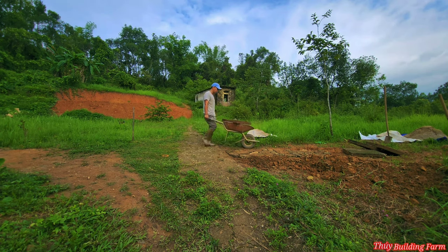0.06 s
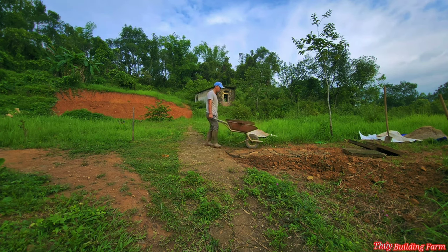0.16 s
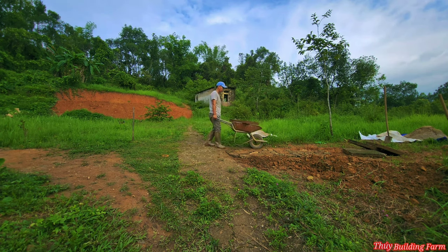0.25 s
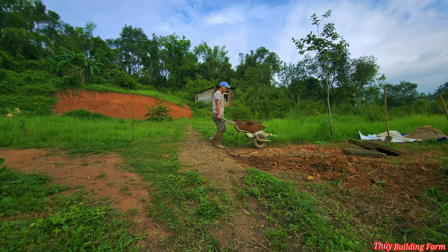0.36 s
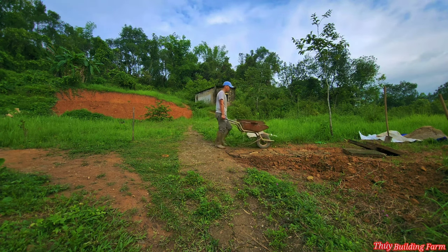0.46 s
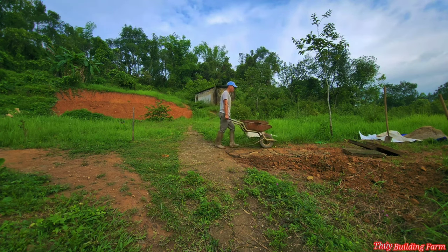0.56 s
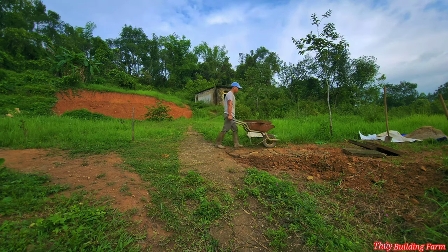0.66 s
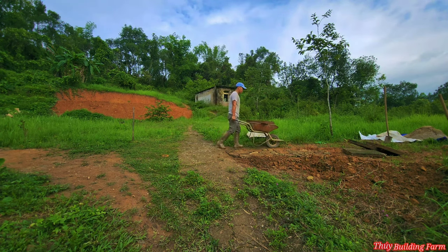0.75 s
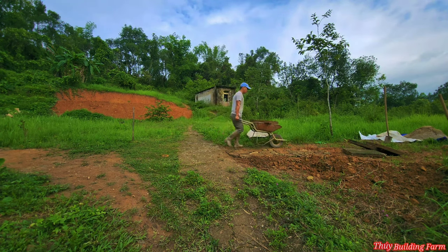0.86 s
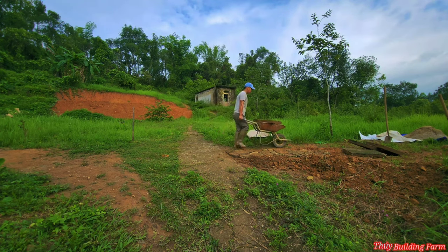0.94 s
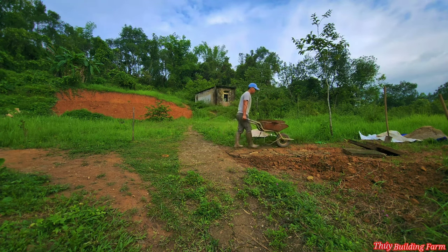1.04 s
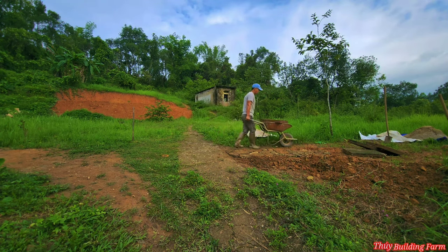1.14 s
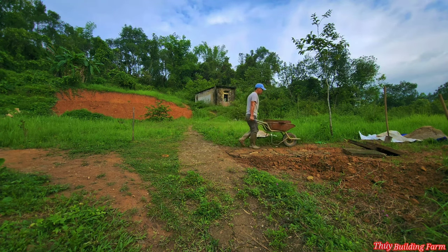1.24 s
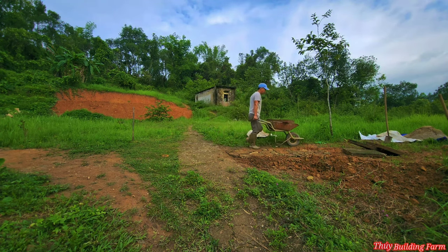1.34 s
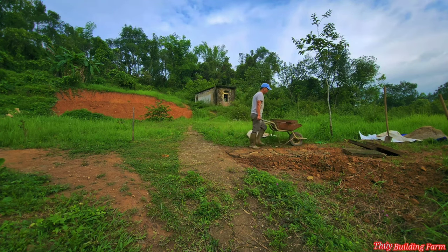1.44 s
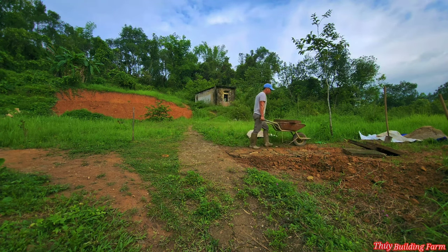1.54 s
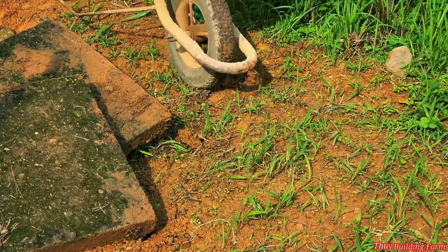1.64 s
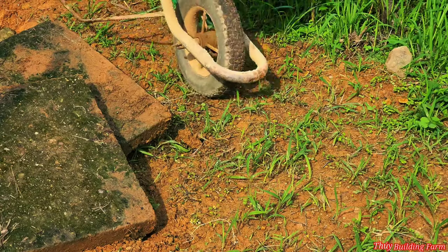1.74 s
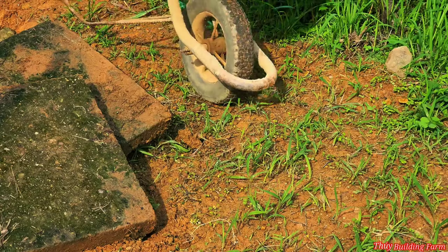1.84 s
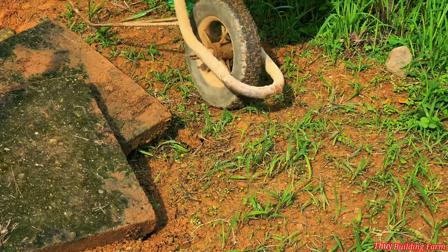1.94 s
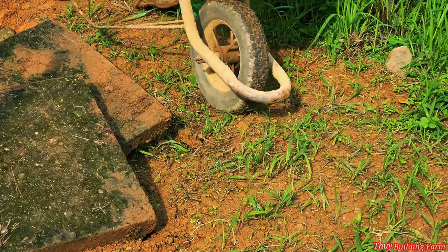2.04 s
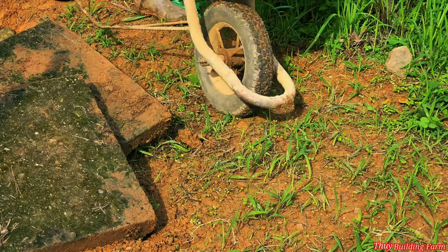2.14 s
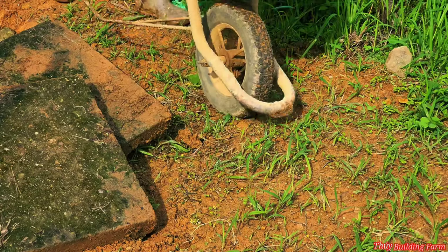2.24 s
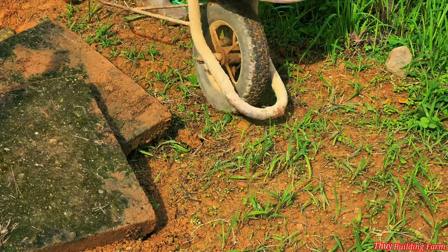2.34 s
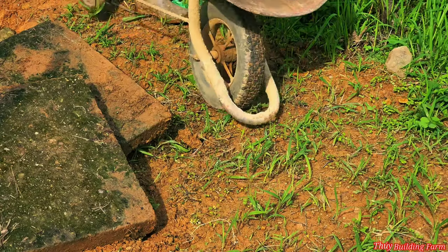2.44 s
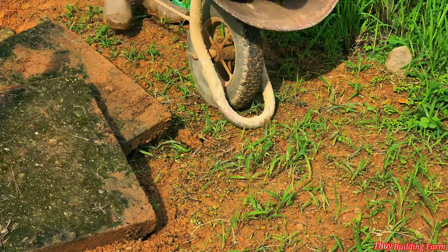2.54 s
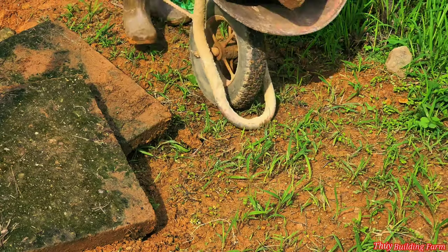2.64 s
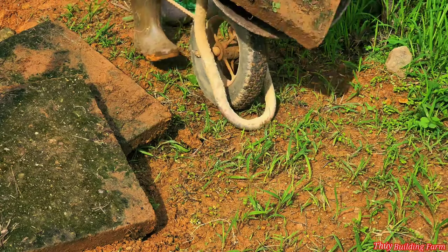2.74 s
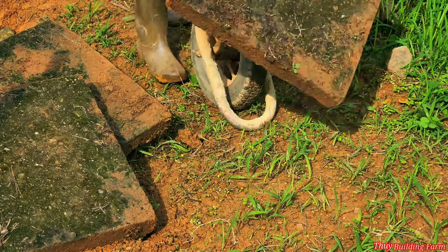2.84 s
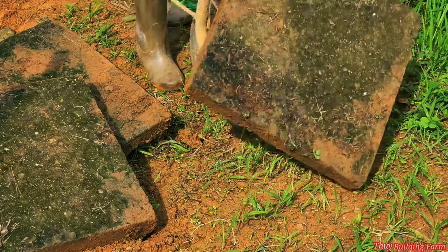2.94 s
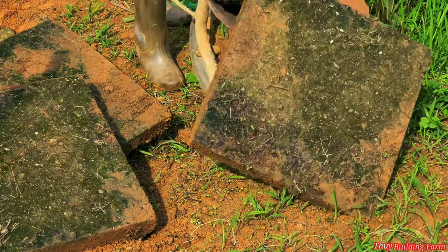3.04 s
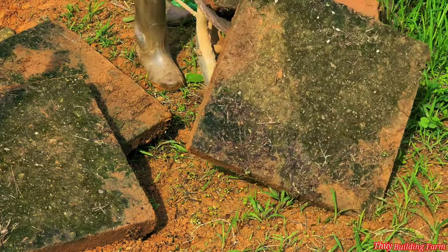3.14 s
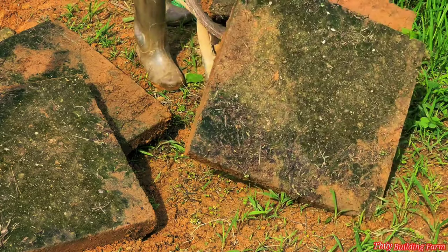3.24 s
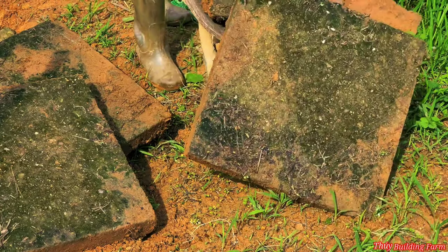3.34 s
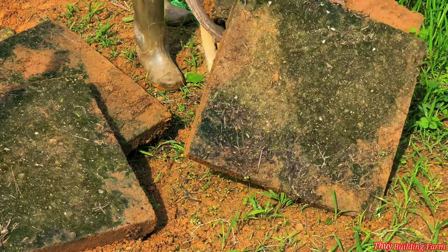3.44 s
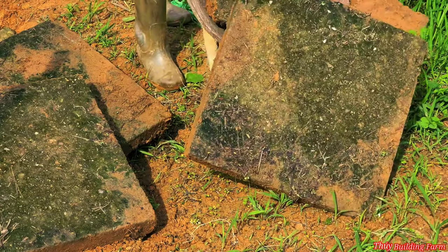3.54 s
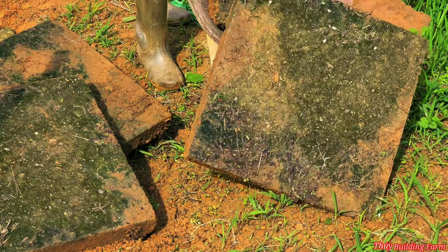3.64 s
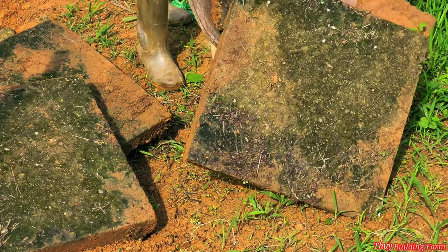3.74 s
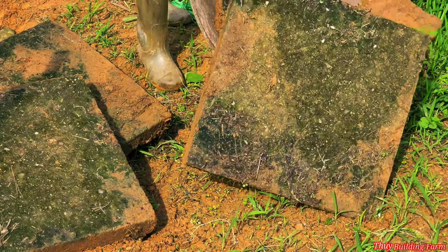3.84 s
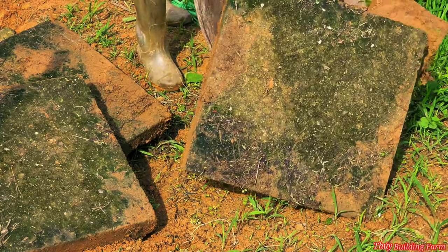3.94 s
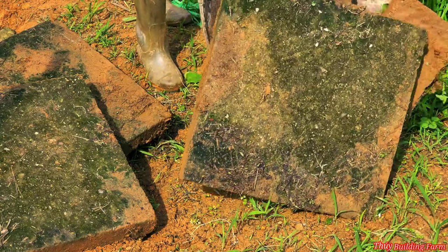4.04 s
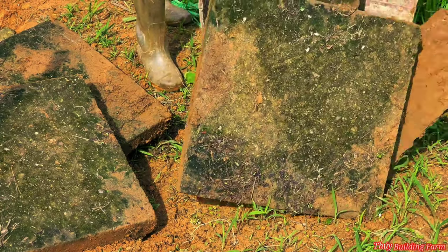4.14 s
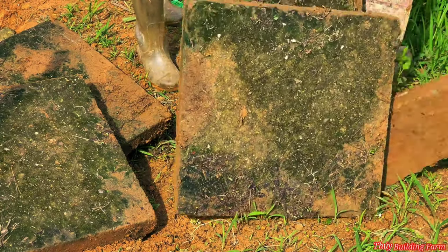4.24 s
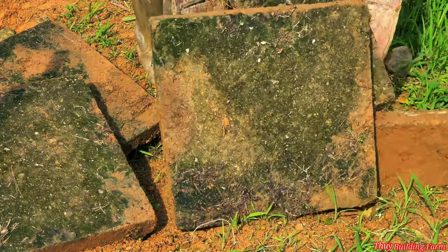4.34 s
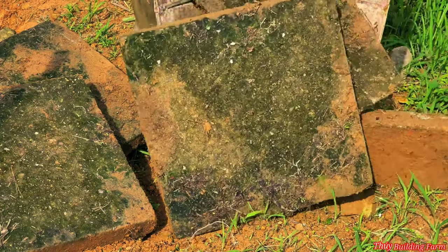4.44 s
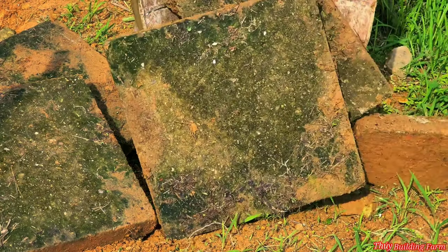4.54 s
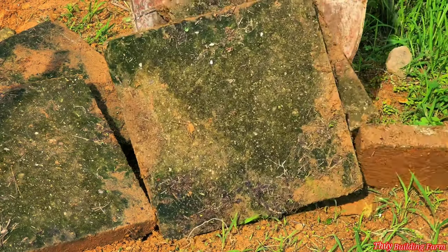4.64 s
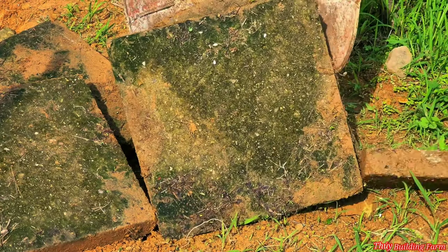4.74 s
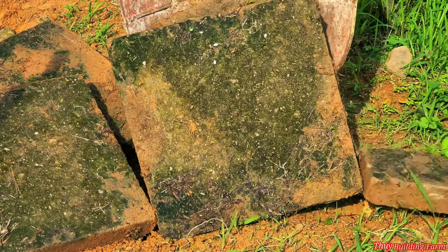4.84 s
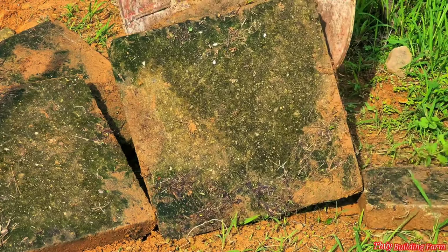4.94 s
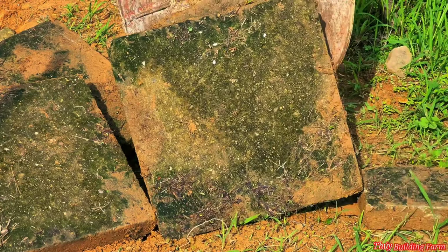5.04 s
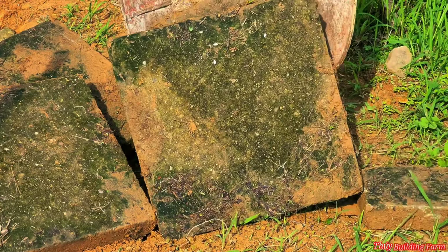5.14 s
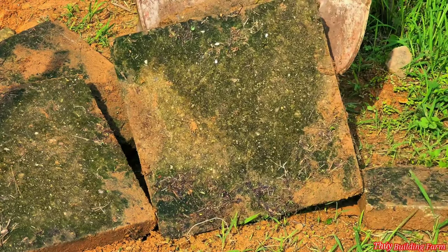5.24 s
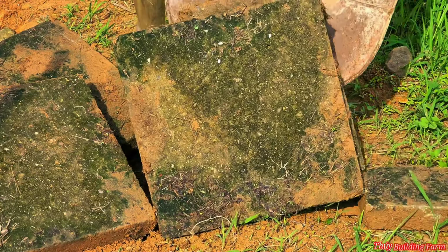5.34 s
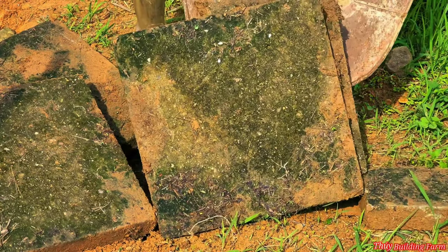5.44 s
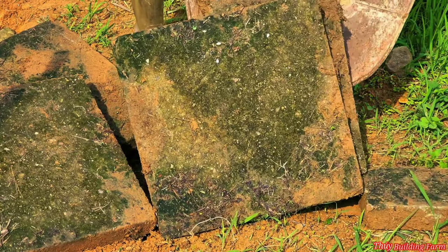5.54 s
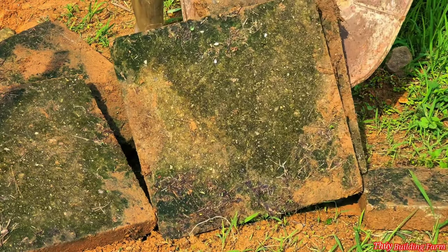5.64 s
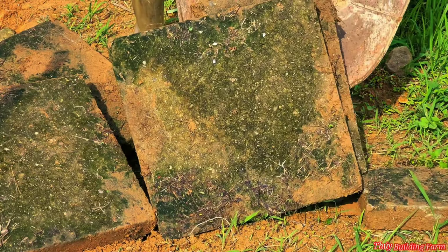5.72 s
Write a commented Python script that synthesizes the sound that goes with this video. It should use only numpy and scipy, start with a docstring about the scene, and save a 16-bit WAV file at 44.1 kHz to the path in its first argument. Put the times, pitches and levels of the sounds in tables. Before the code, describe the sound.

A quiet open field: cicadas shimmer and pulse all around, a thin high cricket trills slightly left, and faint air and leaves hiss. From 0 to 1.8 s a distant wheelbarrow gives small thumps, dry crunches, light rattles and faint creaks; a small bird to the right throws quick falling chirps at about 0.7-1.1 s. The insects become steadier after 1.7 s, with very faint chirps near 2.3 s. At about 2.65 s, close and much louder, stone slabs grind in jerky lurches down a steel tray until 3.4 s, gritty and rasping, with a tiny high squeak. A lull follows, with slight scraping, soft squeals and bird whistles at 3.6-4.0 s. From 4.05 to 4.95 s heavier sliding returns with hollow tray booms, sharp skids and a clack at 4.5 s. Knocks settle from 5.0 s, a bright scrape and squeal comes at 5.27 s, then small scrapes and a last light knock at 5.65 s.

```python
"""On a breezy field, a steel wheelbarrow is pushed far off among cicadas, a cricket and a small bird.
Then, close by, it is tipped: stone slabs judder down the booming tray, skid grittily over one another
and knock as they settle on the dirt. Random jolts and grains shake the resonances of stone and steel;
filtered noise makes cicadas, air and leaves; sliding sines make the bird, creaks and squeals."""
import sys
import numpy as np
from scipy import signal
from scipy.fft import rfft, irfft
from scipy.io import wavfile
from scipy.ndimage import uniform_filter1d

SR = 44100
rng = np.random.default_rng(int(sys.argv[2]) if len(sys.argv) > 2 else 0)


def inscribe(sig):
    """Save sig as 16-bit PCM at rate SR to the path in sys.argv[1].

    A 1-D sig is mono; a 2-D sig holds one channel per row.
    Samples are clipped to [-1, 1] before scaling.
    """
    pcm = np.round(np.clip(np.atleast_2d(sig).T, -1, 1) * 32767)
    wavfile.write(sys.argv[1], SR, pcm.astype(np.int16))


N = 254898

# resonances of the steel tray under grinding: pitch_hz, width_hz, relative level_db
TRAY_MODES = [(153.4, 36, -2), (202.3, 15.7, 0.5), (233.9, 9.5, 3.5), (319.3, 24, -5.5), (370, 18, -5.5),
              (388.3, 7.1, 1), (421.8, 15, -5), (517.5, 31, 0.5), (540.5, 6.9, -7.5), (605.3, 17, -1),
              (856, 79, -2), (882.5, 4.1, 7.5), (932.7, 8.8, 3.5), (1120, 5.4, -13), (1341, 6.3, 3),
              (1462, 47, -10), (1560, 7, -3), (1870, 13, -9), (1884, 71, -10), (2090, 27, -11),
              (2250, 29, -17)]
# tray and frame flexing as a whole: pitch_hz, width_hz, relative level_db
FRAME_MODES = [(54, 9.1, -9), (81, 10, -0.5), (92.4, 17, 1), (120, 15, 5)]
# a slab's own ring: pitch_hz, width_hz, relative level_db
SLAB_MODES = [(455, 73, -4), (503, 8.5, -7), (868, 20, 1), (1015, 5.5, 10), (1314, 18, 8.5),
              (1650, 7.7, -25), (2225, 74, -2), (2420, 60, -13), (2720, 14, -7), (3350, 24, -8),
              (3560, 13, -8), (4400, 14, -7), (4920, 23, -6.5)]
# tone colour of rubbed slabs: frequency_hz, relative level_db (per Hz)
SLAB_SPECTRUM = [(90, -8.5), (180, -10.5), (450, 8), (760, 9), (950, 9), (1400, 1), (1750, -2.5),
                 (2100, -34), (2800, -31.5), (5000, -17.5), (15000, -38)]


def from_db(db):
    """Turn decibels into a gain."""
    return np.exp(np.asarray(db) * (np.log(10) / 20))


def rms_one(x):
    """Scale a sound to an average power of one."""
    return x / np.sqrt(np.mean(x ** 2) + 1e-20)


def seconds():
    """The time of every sample."""
    return np.arange(N) / SR


def gains(rows):
    """Turn each dB column of a curve over time into a gain for every sample."""
    s, *columns = np.transpose(rows)
    return [from_db(np.interp(seconds(), s, column)) for column in columns]


def colour(x, spectrum):
    """Filter with the given spectrum, responding as promptly as possible (minimum phase)."""
    size = 8192
    hz, db = np.transpose(spectrum)
    grid_hz = np.maximum(np.arange(size // 2 + 1) * SR / size, 1)
    grid_db = np.interp(np.log(grid_hz), np.log(hz), db)
    # folding the cepstrum forward makes the filter answer only after its input
    cepstrum = irfft(np.log(from_db(grid_db)))
    cepstrum[1:size // 2] *= 2
    cepstrum[size // 2 + 1:] = 0
    response = irfft(np.exp(rfft(cepstrum)))
    response = response.reshape((1,) * (x.ndim - 1) + (-1,))
    return signal.fftconvolve(x, response, axes=-1)[..., :N]


def band(x, low_hz, high_hz):
    """Gently keep the frequencies between two limits."""
    limits_hz = [low_hz, min(high_hz, SR / 2 - 500)]
    return signal.sosfilt(signal.butter(2, limits_hz, "band", fs=SR, output="sos"), x)


def noise(channels=1):
    """White noise, unrelated in each channel."""
    return rng.standard_normal((channels, N))


def drift(per_s):
    """A random wander around zero, with per_s new random values a second joined by lines."""
    knots = rng.standard_normal(N // 8)
    return np.interp(seconds() * per_s, np.arange(len(knots)), knots)


def slips(per_s, spread_db, channels=1):
    """Random catches and releases of rough stone, as clicks of uneven size and either sign."""
    sizes = from_db(spread_db * np.minimum(rng.exponential(1, (channels, N)), 4))
    chance = rng.uniform(-1, 1, (channels, N))
    happens = np.abs(chance) < per_s / SR
    return rms_one(sizes * np.sign(chance) * happens)


def resonate(x, modes, wander_db=0):
    """Ring side-by-side resonances; as the contact point moves, each is driven now more, now less."""
    out = 0
    for k, (hz, width_hz, db) in enumerate(modes):
        r = np.exp(-np.pi * width_hz / SR)   # a wider resonance dies sooner
        poles = [1, -2 * r * np.cos(2 * np.pi * hz / SR), r * r]
        drive = x * from_db(wander_db * drift(24)) if wander_db else x
        ring = signal.lfilter([1, 0, -1], poles, drive + 1e-18)
        out = out + (-1) ** k * from_db(db) * (1 - r * r) / 2 * ring
    return out


def steady(x, size=3000):
    """Even out the slow level over size samples and keep the fast grain."""
    return x / np.sqrt(np.abs(uniform_filter1d(x ** 2, size)) + 1e-9)


def stroke(start_s, rise_s, fall_s):
    """The level of a rub, which bites quickly, peaks and runs out."""
    t = seconds() - start_s
    return np.sqrt(np.clip(t / rise_s, 0, 1)) * np.clip(1 - (t - rise_s) / fall_s, 0, 1)


def scatter(x, t60_s, channels=1):
    """Echo off many surfaces: a dense cloud of reflections that falls 60 dB in t60_s."""
    t = np.arange(SR // 2) / SR
    cloud = rng.standard_normal((channels, len(t))) * from_db(-60 * t / t60_s)
    cloud /= np.sqrt(np.sum(cloud ** 2, axis=1, keepdims=True))
    return signal.fftconvolve(np.atleast_2d(x), cloud, axes=1)[:, :N]


def glide(start_s, length_s, first_hz, last_hz, bend):
    """A sine that swells and fades while its pitch slides; bend shapes the slide."""
    out = np.zeros(N)
    at = round(start_s * SR)
    u = np.linspace(0, 1, round(length_s * SR))
    hz = first_hz + (last_hz - first_hz) * u ** bend
    swell = np.sqrt(2) * np.sin(np.pi * u)
    out[at:at + len(u)] = swell * np.sin(2 * np.pi * np.cumsum(hz) / SR)
    return out


def widen(mid, side):
    """Make left and right from a centre and a difference: bass is central, treble comes from all round."""
    # filter on the left-right difference: frequency_hz, level_db
    width_curve = [(60, -13), (110, -68), (200, -27), (380, -19.5), (700, -12.5), (1290, -12), (2380, -7),
                   (4400, -1.5), (8120, 1), (15000, 0.5)]
    return mid + colour(side, width_curve) * [[1], [-1]]


def between_faces(x, share, gap_s, count=4):
    """Reflections between moving slab faces: their paths change, so the colour keeps shifting."""
    out = x
    for k in range(count):
        lag = gap_s * SR * np.sqrt(np.e) ** k * (1 + .1 * np.clip(drift(11), -3, 3))   # in samples
        delayed = x[:, np.clip(np.arange(N) - lag.astype(int), 0, N - 1)]
        out = out + share * (-1) ** k * delayed
    return out


def air():
    """Filtered noise for open air, a breeze rumbling close to the ground and a thin hiss of leaves."""
    # tone colour of the open field: frequency_hz, relative level_db
    field_spectrum = [(25, -18), (60, -6), (110, 0), (160, -1), (240, -12), (400, -16), (680, -19),
                      (1000, -24), (1700, -24), (2700, -34), (3500, -40)]
    # low rumble of the breeze: time_s, level_db
    breeze_curve = [(0, -85), (1.7, -78), (2.0, -59.5), (5.78, -45)]
    # tone colour of the leaves: frequency_hz, relative level_db (per Hz)
    leaf_spectrum = [(400, -8), (1500, 6), (3000, -4), (6000, -4), (10000, -5.5), (15000, -7.5)]
    partly_shared = noise() + 0.41 * noise(channels=2)   # left and right are alike but not equal
    field = from_db(-59.5) * rms_one(colour(band(partly_shared, 28, 5500), field_spectrum))
    breeze = gains(breeze_curve)[0] * rms_one(band(noise(), 51, 115))
    leaves = from_db(-61.5) * rms_one(colour(noise(channels=2), leaf_spectrum))
    return field + breeze + leaves


def throbbing():
    """Gain of the cicada chorus, which throbs quickly in step and surges every few throbs."""
    throb_s, throbs_per_surge, surge_at_s = .1295, 4, .39
    turn = 2 * np.pi * (seconds() - surge_at_s) / throb_s
    swing_db = 1.4 * np.cos(turn) + 1.3 * np.cos(turn / throbs_per_surge)
    depth = np.where(seconds() < 1.7, 1, 0.071)   # from 1.7 s the chorus is more even
    return from_db(-49.5 + swing_db * depth)


def insects():
    """A cicada chorus of flickering noise shimmers all round; a pulsed high tone is one cricket's trill."""
    # tone colour of the cicadas: frequency_hz, relative level_db
    cicada_spectrum = [(3500, -33), (4200, -11), (5000, -4), (5450, 4), (5850, -0.5), (6200, -12),
                       (6800, -26), (7800, -10.5), (8500, -16), (8900, -20.5)]
    # the cricket before it is placed left of centre: time_s, level_db
    cricket_curve = [(0, -65), (1.78, -63.5), (1.88, -70), (5.78, -62)]
    chorus = rms_one(colour(band(noise(channels=2), 3500, 9500), cicada_spectrum))
    chorus = chorus * from_db(1.1 * drift(180) + 1.1 * drift(20))
    wingbeat = (.5 + .5 * np.cos(2 * np.pi * 40 * seconds())) ** 0.99   # 40 pulses a second
    tone_hz = 8530 + 35 * drift(200)
    tone = np.sin(2 * np.pi * np.cumsum(tone_hz) / SR)
    trill = gains(cricket_curve)[0] * rms_one(wingbeat * tone) * from_db([[-1.0], [-5.0]])
    return throbbing() * chorus + trill


def far_barrow():
    """Wheel and boots thump on the path, dry dirt crunches, the load rattles, the wheel creaks."""
    # bumps along the path: start_s, length_s, thump_db, crunch_db, rattle_db
    bump_table = [(0.029, 0.054, -49, -46.5, -51.5), (0.056, 0.19, -54, -45.5, -67),
                  (.385, 0.056, -51.5, -49.5, -47.5), (0.422, 0.043, -48.5, -49, -47.5),
                  (0.807, 0.046, -63, -79, -76), (1.299, .16, -55.5, -52.5, -63),
                  (1.446, .17, -60, -53.5, -61), (1.828, 0.021, -51.5, -58, -71)]
    # faint creaks of the wheel: start_s, length_s, first_hz, last_hz, level_db (before it flickers)
    creak_table = [(0.542, 0.14, 390, 346, -68), (1.292, 0.069, 395, 296, -56),
                   (1.49, 0.12, 282, 407, -60.5)]
    # tone colours of thump, crunch and rattle: frequency_hz, relative level_db
    thump_spectrum = [(60, 4), (160, 21), (370, 10), (600, 22), (1200, 2), (4000, -50)]
    crunch_spectrum = [(300, -25), (600, -8), (950, -14), (1400, -3), (1850, 1), (2200, -9), (2600, -14),
                       (5000, -28), (12000, -45)]
    rattle_spectrum = [(1000, -21), (3000, 22), (8000, 14), (15000, 0)]
    rise_share = 0.28   # of a bump's length
    # one set of grains common to both ears, one different in each
    grains = slips(per_s=2500, spread_db=4) + slips(per_s=2500, spread_db=4, channels=2)
    bumps = [(stroke(s, length_s * rise_share, length_s * (1 - rise_share)), levels_db)
             for s, length_s, *levels_db in bump_table]
    creaks = sum(from_db(db) * glide(s, length_s, first_hz, last_hz, bend=0.91)
                 for s, length_s, first_hz, last_hz, db in creak_table)
    out = creaks * from_db(6.3 * drift(52.0))
    for k, spectrum in enumerate([thump_spectrum, crunch_spectrum, rattle_spectrum]):
        level = sum(bump * from_db(levels_db[k]) for bump, levels_db in bumps)
        out = out + rms_one(colour(grains, spectrum)) * level
    return out


def bird():
    """Runs of quick falling chirps and a few whistles from the right, with a faint echo from the trees."""
    # runs of chirps: first_chirp_middle_s, chirp_count, first_chirp_db (before placing)
    phrases = [(.727, 4, -42), (.949, 3, -41), (2.27, 2, -58), (2.424, 3, -60)]
    # longer falling whistles: start_s, length_s, level_db (before placing)
    whistles = [(3.637, 0.026, -47.5), (3.695, 0.053, -43), (3.968, .06, -44)]
    gap_s, chirp_s, swell_db = .036, .0222, 1.2   # each chirp is a little louder than the last
    song = 0
    for s, count, db in phrases:
        for k in range(round(count)):
            start_s = s + k * gap_s - chirp_s / 2
            song = song + from_db(db + swell_db * k) * glide(start_s, chirp_s, 5080, 4000, bend=1.15)
    for s, length_s, db in whistles:
        song = song + from_db(db) * glide(s, length_s, 5800, 3780, bend=0.5)
    echo = from_db(-12) * scatter(song, t60_s=0.28, channels=2)
    return song * from_db([[-3.0], [3.0]]) + echo


def lurch(start_s, rise_s, hold_s):
    """Sliding speed: the slab gathers way, keeps it and is braked by friction."""
    t = seconds() - start_s
    stop_db_per_s = 165
    braking = from_db(-stop_db_per_s * np.maximum(t - rise_s - hold_s, 0))
    return np.clip(t / rise_s, 0, 1) * braking


def slide_levels():
    """Each lurch drives low grinding, treble bite and the tray's boom; lurches add in power."""
    # a slab lurches, slides and stops: start_s, rise_s, hold_s, relative level_db,
    # treble bite_db and tray boom_db (both against the level)
    lurches = [(2.652, 0.057, 0.11, -22.5, -8.5, -16.5), (2.746, 0.049, 0.046, -12.5, -6, -19),
               (2.844, 0.067, 0.12, -10, -6, -21.5), (3.036, 0.051, 0.17, -10.5, -5.5, -12.5),
               (3.274, 0.029, 0.064, -10, -5.5, -11), (3.485, 0.032, 0.17, -36.5, -6.5, 1.5),
               (3.67, 0.079, 0.36, -27.5, -5, -6.5), (4.076, 0.045, 0.07, -13.5, -9, -5.5),
               (4.172, .07, 0.07, -11.5, -4.5, -11), (4.385, 0.058, .05, -19, -1, -5),
               (4.517, 0.014, 0.051, -15.5, -1, -1.5), (4.596, .03, 0.065, -18, -3, -7.5),
               (4.704, 0.063, 0.095, -11.5, -5, -9), (4.88, 0.021, 0.025, -11.5, -11.5, -4),
               (5.305, 0.063, 0.11, -24, -3.5, -3), (5.462, 0.016, 0.014, -22, -16, -21),
               (5.56, 0.03, 0.2, -41, -6, -5.5)]
    power = 0
    for s, rise_s, hold_s, db, bite_db, boom_db in lurches:
        levels = from_db([[db], [db + bite_db], [db + boom_db]])
        power = power + (lurch(s, rise_s, hold_s) * levels) ** 2
    return np.sqrt(power)


def sliding():
    """Stick-slip jolts shake slab, tray and frame; sand is crushed under each jolt."""
    # tone colour of crushed sand: frequency_hz, relative level_db (per Hz)
    grit_spectrum = [(800, -11), (2300, 12.5), (3500, 6.5), (5000, 2.5), (8000, -2.5), (11000, -6),
                     (13500, -3.5), (15500, -5.5)]
    low, high, boom = slide_levels()
    grit = from_db(-10) * high ** 0.92   # sand grows a little more slowly than the bite
    jolts = slips(per_s=300, spread_db=3.5)[0]
    force = jolts + from_db(-7) * slips(per_s=5000, spread_db=3)[0]
    reflected = between_faces(force[None], share=0.73, gap_s=.004)[0]
    stone = steady(colour(reflected, SLAB_SPECTRUM))
    tray = steady(resonate(force, TRAY_MODES, wander_db=5.5))
    shaken = stone + tray
    grind = low * steady(band(shaken, 179, 607))
    bite = from_db(2.5) * high * steady(band(shaken, 1020, 2970))
    frame = steady(band(resonate(force, FRAME_MODES), 30, 220), size=2200)
    body = grind + bite + from_db(-1.5) * boom * frame
    # each jolt presses on the sand for about 23 ms
    pressure = rms_one(signal.lfilter([1], [1, -np.exp(-1 / (0.023 * SR))], np.abs(jolts)))
    grains = slips(per_s=4200, spread_db=0.5, channels=2) * (.5 + pressure)
    sand = grit * steady(colour(between_faces(grains, share=0.65, gap_s=.0011), grit_spectrum))
    return widen(body + sand[0], scatter(body, t60_s=0.14)[0] + sand[1])


def knocking():
    """An edge lands and crumbles for a few ms; the slab rings briefly and the tray answers."""
    # slabs knock: time_s, then relative thud_db, clack_db, crack_db
    knocks = [(2.681, -20.5, -24.5, -56), (4.514, -13, -17, -22), (4.975, -17, -40, -24.5),
              (5.04, -20.5, -29, -30.5), (5.122, -18, -19.5, -24.5), (5.22, -13.5, -17.5, -21),
              (5.647, -30, -20.5, -18.5)]
    # frequency limits of thud, clack and crack: low_hz, high_hz
    knock_bands = [(320, 900), (900, 2800), (2800, 19000)]
    # time for thud, clack and crack to fall 60 dB: fall_s
    knock_falls = [0.12, 0.21, 0.067]
    trims_db = [-2.0, -2.0, 4.0]   # added to thud, clack and crack
    crush, blow = 0, 0
    for k, ((low_hz, high_hz), t60_s) in enumerate(zip(knock_bands, knock_falls)):
        clicks = np.zeros(N)
        for s, *levels_db in knocks:
            clicks[round((s - .001) * SR)] = from_db(levels_db[k] + trims_db[k])
        dying = signal.lfilter([1], [1, -from_db(-60 / (t60_s * SR))], clicks + 1e-18)
        soften = np.exp(-1 / (.003 * SR))   # a 3 ms onset
        envelope = signal.lfilter([1 - soften], [1, -soften], dying)
        crush = crush + envelope * steady(band(noise(channels=2), low_hz, high_hz), size=500)
        blow = blow + band(clicks, low_hz, high_hz)
    ring = resonate(from_db(44.5) * blow + from_db(2) * crush[0], SLAB_MODES)
    # struck by a knock, the tray rings longer than under grinding
    ringing_tray = [(hz, width_hz * .4, db) for hz, width_hz, db in TRAY_MODES]
    answer = from_db(10.0) * resonate(crush[0], ringing_tray)
    echo = from_db(-10.5) * scatter(crush, t60_s=1.0, channels=2)
    return widen(crush[0] + ring + answer, crush[1]) + echo


def thumping():
    """The load lurches and thumps the tray: soft pushes wake the low modes of tray and frame."""
    # pushes: time_s, relative level_db
    push_table = [(2.805, -14), (2.913, -12), (3.754, -18.5), (4.029, -13), (4.088, -13), (4.146, -13),
                  (4.291, -3.5), (4.75, -1.5), (4.835, -6), (4.926, -22), (5.059, -18.5), (5.223, -20.5),
                  (5.51, -22.5), (5.657, -18.5)]
    pushes = np.zeros(N)
    for s, db in push_table:
        pushes[round(s * SR)] = from_db(db)
    soft = from_db(43.5) * band(pushes, 89, 317)
    tray = resonate(soft, TRAY_MODES)
    frame = from_db(-6) * resonate(soft, FRAME_MODES)
    return tray + frame + from_db(-8) * soft


def skidding():
    """Fast skids shear sand between slabs: a bright rasp over the voice of stone, and squeals from edges and
    tray."""
    # stone skids on stone: start_s, rise_s, fall_s, hiss level_db, body_db (against the hiss)
    skids = [(2.883, 0.03, 0.035, -24.5, 5), (3.056, 0.011, 0.046, -19.5, 4.5),
             (3.18, 0.015, 0.038, -24, -12), (3.35, 0.009, 0.034, -19.5, -1), (3.535, .01, .04, -41, -4),
             (3.755, 0.018, .07, -39.5, -8), (4.253, 0.0021, 0.011, -20.5, 5), (4.407, 0.015, 0.08, -16, 1),
             (4.511, 0.005, 0.15, -21.5, 0.5), (4.616, 0.015, 0.033, -25.5, 3.5),
             (4.704, 0.009, 0.043, -25.5, 5.5), (4.853, 0.021, 0.054, -21.5, -1),
             (5.267, 0.017, 0.068, -16, -7), (5.349, 0.0087, 0.12, -27.5, 2.5)]
    # squeals of dragged stone edges and of the steel tray: start_s, length_s, pitch_hz, level_db (before it
    # flutters)
    squeals = [(3.218, 0.022, 6985, -29.5), (3.65, 0.043, 1820, -47), (3.965, 0.066, 1795, -36.5),
               (5.271, 0.049, 2278, -21)]
    # tone colour of the hiss: frequency_hz, relative level_db (per Hz)
    hiss_spectrum = [(500, -17.5), (1700, -4), (2350, 6.5), (3000, 6.5), (4500, 4), (8000, 2),
                     (11000, -1.5), (13500, 1.5), (15500, -5.5)]
    shear = slips(per_s=4900, spread_db=-0.5, channels=2) * from_db(drift(250))
    shear = between_faces(shear, share=0.74, gap_s=.0013)
    shear = shear + from_db(5) * resonate(shear[0], SLAB_MODES) * [[1], [0]]   # the ring is central
    hiss = rms_one(colour(shear, hiss_spectrum))
    body = rms_one(colour(shear, SLAB_SPECTRUM))
    rasps = 0
    for s, rise_s, fall_s, db, body_db in skids:
        rub = from_db(db) * stroke(s, rise_s, fall_s)
        rasps = rasps + rub * (hiss + from_db(body_db) * body)
    # the pitch of a squeal rises by 1.5 percent
    squeaks = sum(from_db(db) * glide(s, length_s, hz, hz * 1.015, bend=0.57)
                  for s, length_s, hz, db in squeals)
    return widen(*rasps) + squeaks * (1 + 0.72 * drift(300))


def scene():
    """The slabs are close and central, with a faint echo from the field."""
    slabs = sliding() + knocking() + thumping() + skidding()
    echo = from_db(-24.0) * scatter(slabs, t60_s=0.53, channels=2)
    return air() + insects() + far_barrow() + bird() + slabs + echo


def record(dry):
    """The highest peaks are rounded and the treble above 15750 Hz is cut."""
    rounded = dry / (1 + np.abs(dry) ** 6) ** (1 / 6)
    return signal.sosfilt(signal.ellip(10, .2, 80, 15750, fs=SR, output="sos"), rounded)


dry = scene()
out = record(dry)
inscribe(out)
```